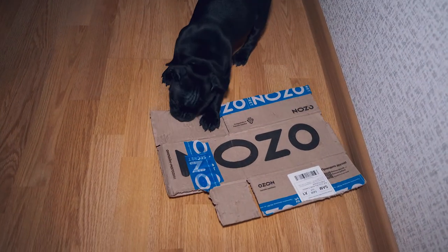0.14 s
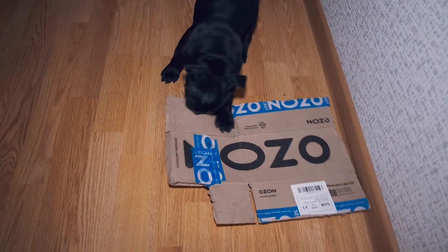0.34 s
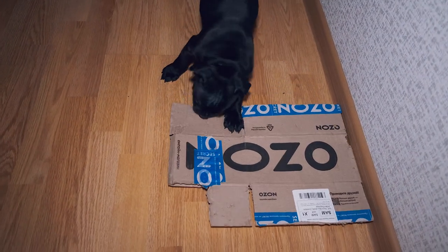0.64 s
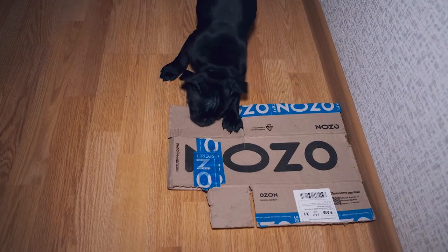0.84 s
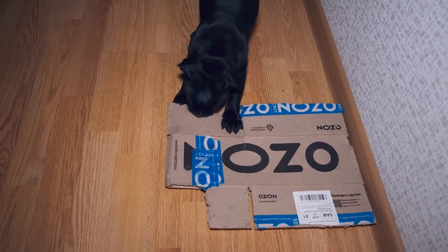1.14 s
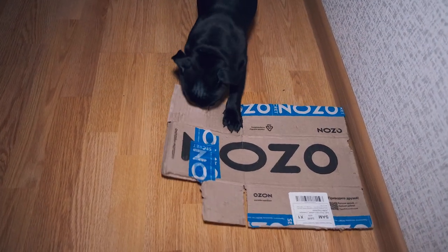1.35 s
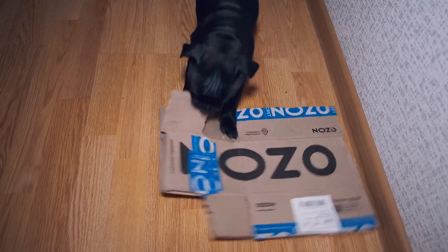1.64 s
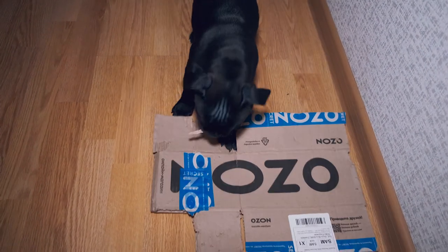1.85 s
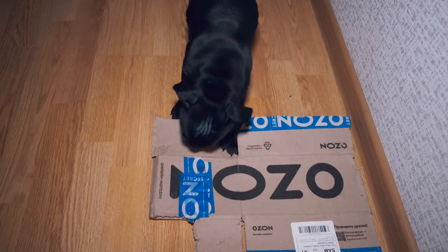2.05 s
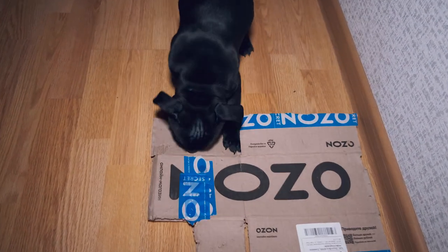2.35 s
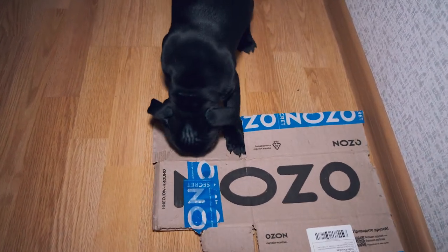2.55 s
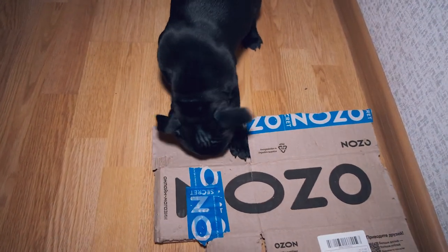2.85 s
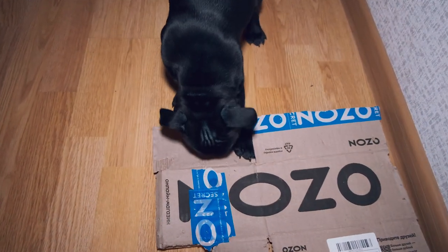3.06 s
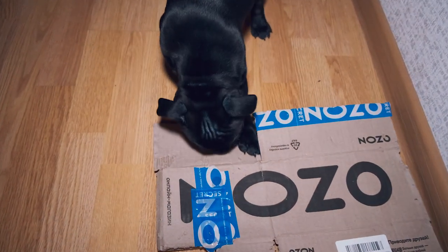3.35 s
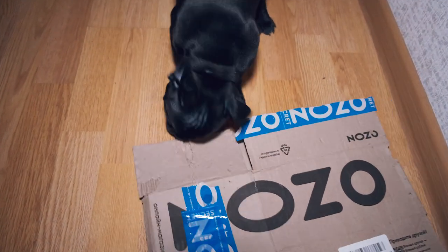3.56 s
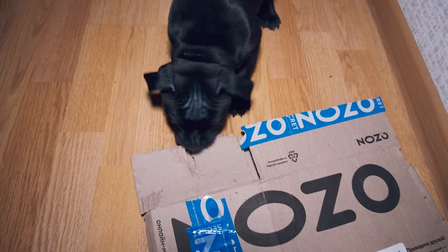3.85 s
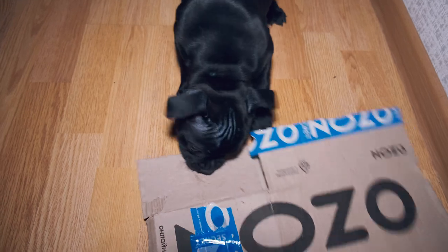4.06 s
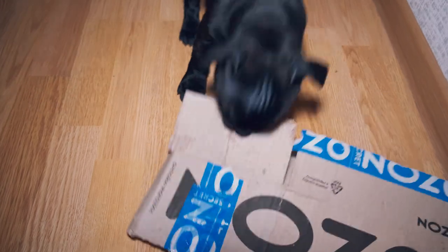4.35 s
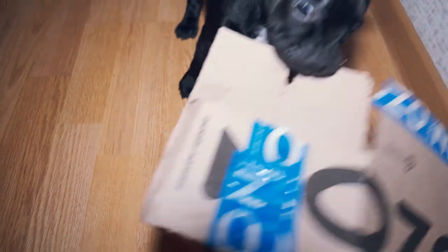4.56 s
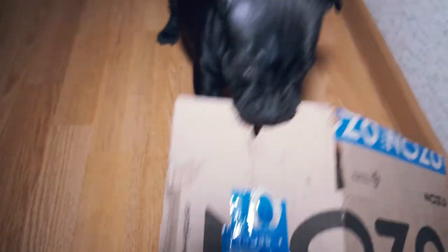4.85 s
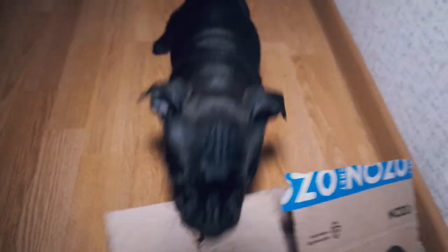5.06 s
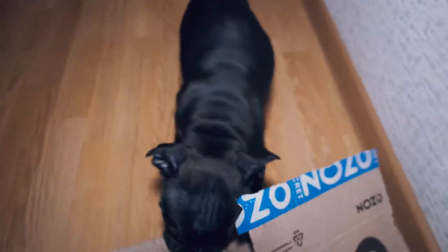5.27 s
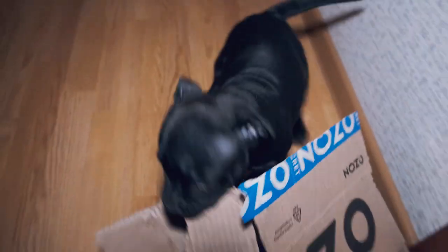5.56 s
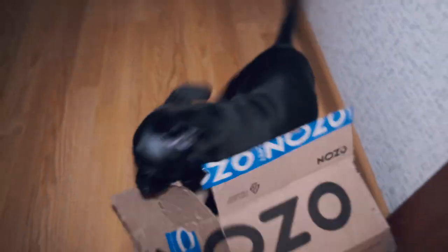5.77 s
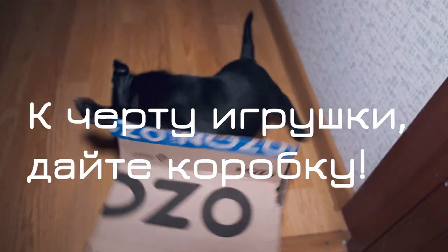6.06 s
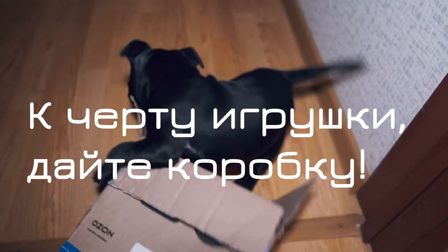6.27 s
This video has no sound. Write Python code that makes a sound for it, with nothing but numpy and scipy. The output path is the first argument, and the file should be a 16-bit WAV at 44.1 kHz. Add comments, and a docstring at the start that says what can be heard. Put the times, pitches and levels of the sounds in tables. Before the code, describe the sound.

Cardboard is bitten and dragged across a hard indoor floor. Woody flute snaps with short falling pitch come irregularly, thickest early on, over fibrous hiss and short groans of the strained sheet. After a sparse lull of soft scratching, the loose sheet flaps, slaps and thuds vigorously to the end. Near microphone, very quiet background air, short bright room echo.

```python
"""A puppy chews and tugs a flattened cardboard box over a laminate floor in a small bare room.
From the start the board scrapes and hisses in strokes of slipping fibres, the loose sheet flaps, paws and
board thump the floor in low resonant noise, and the strained board groans in short gliding tones.
Flutes snap throughout as brief falling rings with cracks and thuds, densest in the second second.
The sheet slaps the floor with claps of noise, mostly from five to six seconds; the walls answer."""
import sys
import numpy as np
from scipy import signal
from scipy.fft import rfft, irfft, next_fast_len
from scipy.io import wavfile
from scipy.ndimage import uniform_filter1d, map_coordinates

SR = 44100
rng = np.random.default_rng(int(sys.argv[2]) if len(sys.argv) > 2 else 0)


def transcribe(signal):
    """Save signal, clipped to [-1, 1], as a 16-bit WAV file at the path in sys.argv[1]."""
    frames = np.atleast_2d(signal).T
    limited = np.clip(frames, -1, 1)
    pcm = np.round(limited * 32767).astype(np.int16)
    wavfile.write(sys.argv[1], SR, pcm)


N = 282240
STEPS_S = np.arange(0, N / SR, .001)  # time steps of the movement envelopes


def amp(db):
    """Decibels to gain."""
    return 10 ** (np.asarray(db) / 20)


def unit(x):
    """Scale to rms 1."""
    return x / np.sqrt(np.mean(x ** 2) + 1e-20)


def along(points, hz):
    """Read (Hz, value) points on a log frequency axis."""
    f, v = np.transpose(points)
    return np.interp(np.log(hz + 1), np.log(f + 1), v)


def per_sample(control):
    """Read a control given at every time step at every sample."""
    return np.interp(np.arange(N) / SR, STEPS_S, control)


def together(powers):
    """The gain of overlapping movements, whose powers add."""
    return per_sample(np.sqrt(sum(powers)))


def wobble(rate):
    """A smooth random curve with rate knots a second."""
    knots = rng.standard_normal(int(N * rate / SR) + 4)
    return map_coordinates(knots, [np.arange(N) * rate / SR])


def filtered(x, response):
    """Filter x by a response that is a function of frequency."""
    size = x.shape[-1]
    m = next_fast_len(size + 8192)
    spectrum = rfft(x, m) * response(np.fft.rfftfreq(m, 1 / SR))
    return irfft(spectrum, m)[..., :size]


def band(x, low_hz, high_hz):
    """A causal band-pass."""
    edges = [low_hz, min(high_hz, SR / 2 - 1)]
    return signal.sosfilt(signal.butter(2, edges, 'bandpass', fs=SR, output='sos'), x)


def resonate(x, modes):
    """Pass x through damped resonances that ring side by side."""
    def response(f):
        return sum(amp(db) * 1j * f * w / (c * c - f * f + 1j * f * w) for c, w, db in modes)
    return filtered(x, response)


def spread(pair, spectrum):
    """Colour two unrelated signals and mix them to left and right, most alike in the bass."""
    # correlation of the two microphone channels: hz, likeness (0 to 1)
    likeness = [(100, 0.93), (400, 0.94), (1000, 0.81), (2000, 0.5), (4000, 0), (12000, .25)]

    def mid_side(hz):
        turn = np.arccos(np.clip(along(likeness, hz), -1, 1)) / 2
        return amp(along(spectrum, hz)) * [np.cos(turn), np.sin(turn)]
    mid, side = filtered(pair, mid_side)
    return unit(np.array([mid + side, mid - side]))


def add(track, s, sound):
    """Mix a sound into the track at time s."""
    start = int(np.clip(round(s * SR), 0, N - 1))
    track[:, start:start + sound.shape[-1]] += sound[..., :N - start]


def room(x, early_db=13, gap_s=.009, early_t60_s=0.055, build_s=0.0018):
    """The walls answer after a short gap: dense first echoes die fast over a slower diffuse tail."""
    # decay of the room: hz, t60_s
    decay_times = [(150, 0.79), (400, 1), (1000, 0.71), (2800, 0.66), (7300, 0.33), (15000, 0.52)]
    # colour of the echoes: hz, level_db
    wall_colour = [(100, 2), (1000, 0), (3000, 2), (8000, 5), (15000, -2.5)]
    hz, t, z = signal.stft(rng.standard_normal((2, SR * 3 // 4)), SR, nperseg=256)
    late = amp(-60 * t / along(decay_times, hz)[:, None])
    early = amp(early_db - 60 * t / early_t60_s)
    tail = signal.istft(z * (late + early), SR, nperseg=256)[1]
    build = 1 - np.exp(-np.arange(tail.shape[1]) / (build_s * SR))
    tail = spread(tail * build, wall_colour) / np.sqrt(tail.shape[1])
    return signal.fftconvolve(x, np.pad(tail, ((0, 0), (int(gap_s * SR), 0))), axes=1)


def gesture(s, length, attack, fall_db_per_s, swell_db=0):
    """Envelope of one movement: it takes hold, builds or fades while it lasts, lets go and lingers."""
    linger, linger_t60_s = amp(-9.5), 0.52  # part of the movement lingers in the room
    t = np.maximum(STEPS_S - s, 0)
    after = np.maximum(t - length, 0)
    release = (1 - linger) * amp(-fall_db_per_s * after) + linger * amp(-60 * after / linger_t60_s)
    swell = amp(swell_db * (np.minimum(t / length, 1) - .5))
    return (1 - np.exp(-(t / attack) ** 2)) * swell * release


def slips(rate, scatter_db, life, smooth):
    """Stick and slip: noise bursts of uneven size at random moments (rate a second), over smooth sliding."""
    sizes = amp(scatter_db * np.clip(rng.standard_normal(N), -2, 2)) * (rng.random(N) < rate / SR)
    energy = signal.lfilter([1], [1, -np.exp(-1 / (life * SR))], sizes ** 2)  # life in s
    return np.sqrt(energy / energy.mean() + smooth ** 2) * rng.standard_normal((2, N))


def quiet_air():
    """The faint air of the room: steady coloured noise."""
    # colour of the air: hz, level_db
    air_colour = [(13, -33), (22, -6), (44, -8), (106, 0), (140, -27.5), (194, -7), (337, -24), (432, -13),
                  (935, -14.5), (1620, -13), (2260, -17), (7000, -21), (16000, -33)]
    return amp(-70.5) * spread(rng.standard_normal((2, N)), air_colour)


def bending(x, colour_db, patchy_db):
    """The bending sheet changes the colour of x and brings out narrow resonances that come and go."""
    hz, t, z = signal.stft(x, SR, nperseg=1024)
    frames = np.minimum((t * SR).astype(int), N - 1)
    patches = uniform_filter1d(rng.standard_normal(z.shape[1:]), size=4, axis=0)
    patches = unit(uniform_filter1d(patches, size=7, axis=1))
    gain = amp(colour_db(hz[:, None] + 1, frames) + patchy_db * patches)
    return unit(signal.istft(z * gain, SR, nperseg=1024)[1][:, :N])


def snap(ring_hz, crack_db, thud_db, t60, rise, crack_share=0.8, thud_t60=0.015, fall=0.55, relax=0.0035):
    """A flute gives way: its fibres crack, the panel rings for a few cycles and the sheet thuds."""
    # modes of a snapping flute: ratio (times the ring pitch), level_db, t60_share
    flute_modes = [(.7, -6, 0.57), (1, -0.5, 0.82), (1.3, -12, 1), (1.72, -13, 1), (2.3, -14, 0.18)]
    # colour of cracking fibres: hz, level_db
    crack_colour = [(1200, -28), (2300, -1), (3300, 1), (4800, -3), (7000, -9.5), (11000, -10),
                    (15000, -16.5)]
    t = np.arange(SR // 10) / SR
    swell = 1 - np.exp(-(t / rise) ** 2)
    # short bending waves run faster through the board, so the pitch falls from above ring_hz to below it
    cycles = np.cumsum(ring_hz * (1 + fall * (np.exp(-t / relax) - .5))) / SR
    ring = np.zeros((2, len(t)))
    for ratio, db, share in flute_modes:
        # each mode reaches the two microphones in slightly different phase
        phase = rng.uniform(0, 2 * np.pi) + rng.normal(0, .27 * ratio, (2, 1))
        decay = amp(db - 60 * t / max(t60 * share, .002))
        ring += decay * np.sin(2 * np.pi * ratio * cycles + phase)
    # noise shared by both channels, with stronger noise of each channel's own
    fibres = rng.standard_normal(len(t)) + 2.9 * rng.standard_normal((2, len(t)))
    fibres = filtered(fibres, lambda hz: amp(along(crack_colour, hz)))
    crack = fibres * swell * amp(-60 * t / (t60 * crack_share))
    thud = band(rng.standard_normal(len(t)) * amp(-60 * t / thud_t60), 240, 750)
    return unit(ring * swell) + amp(crack_db + 9.0) * unit(crack) + amp(thud_db + 0.5) * unit(thud)


def crackling(rate=110, scatter_db=4.5, low_hz=950, high_hz=2000, count=5):
    """Tiny snaps of uneven size at random moments (rate a second), at a few pitches of the board."""
    track = np.zeros((2, N))
    for ring_hz in np.geomspace(low_hz, high_hz, count):
        sizes = amp(scatter_db * np.clip(rng.standard_normal(N), -2, 1.6))
        sizes = sizes * (rng.random(N) < rate / count / SR)
        tiny = snap(ring_hz, crack_db=-16.5, thud_db=-22, t60=0.014, rise=0.00021)
        track += signal.oaconvolve(sizes[None], tiny, axes=1)[:, :N]
    return unit(track)


def rubbing(panel_db=5, panel_octaves=0.85, patchy_db=3.0, hiss_patchy_db=3.0):
    """Slipping fibres hiss, crackle and shake the panel; strokes blend their colours by their power."""
    # strokes of the board over teeth and floor: start_s, length_s, swell_db (over the stroke),
    # scrape_db, hiss_db (relative), rasp_db (in the hiss), sheen_db (tilt of the hiss), panel_hz
    strokes = [(0, 0.15, 6.5, -49.5, -52.5, 3, -2.5, 1630), (0.117, .09, 3, -35.5, -51.5, 7.5, -2, 1600),
               (0.325, .13, 0.5, -40, -51.5, -0.5, 3.5, 1400), (0.492, 0.12, -6.5, -49, -57, -1, -1, 1300),
               (0.635, 0.28, -4, -52, -54.5, -6.5, 5.5, 1470),
               (0.888, 0.084, 14.5, -46, -56, 4.5, 12, 1480), (1.135, .09, 3, -55.5, -57, -2, 1.5, 1400),
               (1.235, .11, -3.5, -30.5, -45, 4.5, -5, 1300), (1.373, .045, 3.5, -41, -39, 3, -0.5, 1310),
               (1.547, 0.036, -0.5, -29.5, -34, 2, -1, 1200), (1.653, 0.03, 4, -22, -36.5, 3, 13, 1080),
               (1.731, .11, -3.5, -36.5, -51.5, 4, 4.5, 1280), (2.069, 0.21, 5.5, -63.5, -68, 1, 6, 1450),
               (2.195, .22, 1.5, -47, -50, -1.5, 3, 1400), (2.525, .15, -3.5, -57, -59, -7, 2, 1352),
               (2.667, 0.12, 15, -39.5, -40.5, 3.5, -0.5, 1800),
               (2.809, 0.042, -2, -31.5, -42, 0.5, -5.5, 2000), (3.417, .16, 3, -37, -38.5, -2.5, 2, 1400),
               (3.63, 0.19, -10, -53.5, -55, -2, 0, 1350), (3.871, .045, 6, -45, -51, -2.5, 3, 1150),
               (3.991, 0.11, -2.5, -42.5, -46, -0.5, 1.5, 1200),
               (4.115, 0.099, 3, -49.5, -47, 1.5, 0, 1600),
               (4.218, 0.23, -1.5, -48.5, -50.5, -1.5, 0.5, 1350),
               (4.461, 0.26, -6.5, -48.5, -54, 0, 1, 1120), (4.74, .05, 7, -48.5, -48, -1.5, 3.5, 1040),
               (4.854, 0.19, -6, -43.5, -44, 1.5, -1, 1170), (5.086, .12, 8, -44, -41.5, -0.5, -0.5, 1100),
               (5.22, 0.086, 1, -34, -46, 3, 4, 1130), (5.33, 0.071, 1, -29, -39.5, 5, 8, 1200),
               (5.406, .11, 3, -28.5, -42.5, 3.5, 5, 1280), (5.542, 0.078, -5, -26, -34.5, -2.5, 0, 1040),
               (5.65, 0.35, 4.5, -35, -43, 1, -0.5, 1250), (5.795, .06, 2, -29.5, -35.5, -4, -0.5, 1270),
               (5.896, 0.048, -4, -41, -36.5, 0, -5, 1190), (6.059, 0.23, -4.5, -39, -46, -1, -1, 1400),
               (6.314, .07, 4.5, -44.5, -50, -1.5, 2, 1560)]
    # colour of the scrape: hz, level_db
    scrape_colour = [(260, -41), (450, -12.5), (513, -6), (799, -3.5), (849, -3), (978, -1), (1140, -2),
                     (1400, -0.5), (2170, -1), (2400, -3), (5000, -20), (6500, -53), (11000, -120)]
    # colour of the fibre hiss: hz, level_db
    hiss_colour = [(1650, -41), (2800, -6.5), (3610, -8.5), (3940, -6.5), (5320, -12), (6670, -9),
                   (11400, -16.5), (14200, -18), (15100, -18.5), (16000, -35.5)]
    grip_s, grip_share = 0.01, 0.099  # a stroke takes hold in this time plus a share of its length
    scrape_fall_db_per_s, hiss_fall_db_per_s = 180.5, 280
    rasp_hz, rasp_octaves = 6800, 0.41  # centre and width of the rasp; the sheen tilts about it

    scraping, hissing = np.zeros((2, len(strokes), len(STEPS_S))) + 1e-14  # power of each stroke
    for k, (s, length, swell_db, scrape_db, hiss_db, *_) in enumerate(strokes):
        attack = grip_s + grip_share * length
        scrape_shape = gesture(s, length, attack, scrape_fall_db_per_s, swell_db)
        hiss_shape = gesture(s, length, attack, hiss_fall_db_per_s, swell_db)
        scraping[k] += (amp(scrape_db) * scrape_shape) ** 2
        hissing[k] += (amp(hiss_db) * hiss_shape) ** 2
    *_, rasps_db, sheens_db, grips_hz = np.transpose(strokes)
    panel_hz = per_sample(grips_hz @ scraping / scraping.sum(0))
    rasp_db = per_sample(rasps_db @ hissing / hissing.sum(0))
    sheen_db = per_sample(sheens_db @ hissing / hissing.sum(0))

    def resonance(hz, i):
        return panel_db * np.exp(-(np.log2(hz / panel_hz[i]) / panel_octaves) ** 2)

    def sheen(hz, i):
        octaves = np.log2(hz / rasp_hz)
        tilt = sheen_db[i] * np.clip(octaves / 0.51, -.6, .7)
        return tilt + rasp_db[i] * np.exp(-(octaves / rasp_octaves) ** 2)

    catches = slips(rate=600, scatter_db=3, life=.001, smooth=1.2)
    scrape = bending(spread(catches, scrape_colour), resonance, patchy_db)
    scrape = unit(scrape + amp(-10) * crackling())
    fine_slips = slips(rate=440, scatter_db=3, life=.0004, smooth=1.8)
    hiss = bending(spread(fine_slips, hiss_colour), sheen, hiss_patchy_db)
    judder = amp(.8 * wobble(45))
    return judder * (together(scraping) * scrape + amp(2.0) * together(hissing) * hiss)


def flapping():
    """The loose sheet swings: uneven bursts of noise excite its low modes."""
    # swings of the sheet: start_s, length_s, level_db (relative)
    swing_list = [(0, 0.25, -47.5), (0.05, 0.039, -38), (0.656, 0.034, -49.5), (0.965, 0.028, -43),
                  (1.106, 0.028, -47.5), (1.279, 0.17, -32), (1.549, 0.02, -31.5), (1.665, 0.028, -30.5),
                  (1.764, 0.074, -39.5), (2.36, 0.034, -51.5), (2.694, .28, -64), (3.467, 0.072, -48.5),
                  (3.94, 0.14, -56), (4.207, .04, -51.5), (4.51, 0.088, -42.5), (4.766, 0.018, -42),
                  (4.878, 0.052, -46), (5.197, 0.019, -32.5), (5.292, .02, -27), (5.36, 0.039, -39),
                  (5.535, 0.063, -38.5), (5.678, 0.22, -41), (5.803, 0.048, -29.5), (5.922, 0.16, -36),
                  (6.172, 0.18, -44)]
    # low modes of the loose sheet and the room: centre_hz, width_hz, level_db
    sheet_modes = [(204, 15, 0), (251, 34, 2), (294.4, 6, 2.5), (382, 71, -9.5), (415, 23, 0.5),
                   (482, 50, -4), (625, 90, -5.5)]
    # colour of the flapping sheet: hz, level_db
    flap_colour = [(90, -36), (150, -7), (190, -0.5), (450, -1.5), (650, -4), (1000, -13.5), (1800, -73.5)]
    attack_s, fall_db_per_s = 0.0076, 134
    swings = together((amp(db) * gesture(s, length, attack_s, fall_db_per_s)) ** 2
                      for s, length, db in swing_list)
    shaken = resonate(slips(rate=75, scatter_db=5.5, life=0.012, smooth=1.0), sheet_modes)
    return amp(-5) * swings * spread(shaken, flap_colour)


def thumping():
    """Paws and board bump the floor: uneven bursts of noise set its deep modes rumbling."""
    # bumps of paws and board: start_s, length_s, level_db (relative)
    bump_list = [(0, 0.023, -64), (0.15, 0.02, -58), (.3, 0.07, -71), (0.65, .22, -52.5),
                 (1.275, 0.16, -55), (1.542, 0.026, -50), (1.65, 0.26, -48.5), (2.004, 0.52, -68.5),
                 (2.7, .35, -72), (3.526, 0.097, -51.5), (4.025, 0.068, -50.5), (4.207, 0.036, -58),
                 (4.566, .03, -56), (4.749, 0.04, -41), (4.86, 0.017, -47.5), (4.99, .3, -57),
                 (5.33, 0.066, -40.5), (5.48, 0.5, -52.5), (5.785, 0.035, -37.5), (5.926, .18, -52.5),
                 (6.255, .11, -44.5)]
    # deep modes of the floor: centre_hz, width_hz, level_db
    floor_modes = [(48, 22, -10.5), (67, 9, 2.5), (95, 9.2, 1.5), (122, 26, -7.5)]
    # colour of the floor's rumble: hz, level_db
    rumble_colour = [(12, -26), (25, -7), (60, -3.5), (120, 0), (160, -14), (300, -46.5)]
    attack_s, fall_db_per_s = 0.01, 150.5
    bumps = together((amp(db) * gesture(s, length, attack_s, fall_db_per_s)) ** 2
                     for s, length, db in bump_list)
    shaken = resonate(slips(rate=32, scatter_db=6, life=0.011, smooth=0.84), floor_modes)
    return amp(-1.5) * bumps * spread(shaken, rumble_colour)


def groaning(waver=0.042, overtone_db=-22, echo_db=-8):
    """The strained board judders briefly at an unsteady, gliding pitch with a faint octave above."""
    # groans and squeaks: centre_s, length_s, pitch_hz, level_db, glide_octaves_per_s
    groan_list = [(0, 0.084, 192, -39, 3.5), (.063, 0.026, 196.8, -32, -1), (0.069, 0.061, 402.5, -40, 3.5),
                  (0.142, .12, 208, -47, -0.5), (1.02, 0.098, 2850, -53.5, -3),
                  (1.137, 0.045, 338, -55.5, 1.5), (1.204, 0.12, 224.6, -50.5, 1),
                  (1.373, .076, 288.6, -35, 4.5), (2.32, .11, 1430, -45, 0), (2.37, .05, 307, -55, 2),
                  (2.43, .1, 445, -48.5, 1), (2.431, 0.14, 587, -52.5, 0.5), (2.844, 0.064, 2200, -29.5, 0),
                  (2.926, .16, 1920, -47.5, -1), (3.003, 0.061, 252.5, -47.5, 1.5),
                  (4.222, .06, 440, -53, 5), (4.568, 0.085, 258, -42.5, -3.5), (4.662, .14, 1110, -50, 1.5),
                  (5.092, 0.07, 248, -53, -2)]
    t = np.arange(N) / SR
    drift, roughness = waver * wobble(110), amp(2 * wobble(70))
    voice = np.zeros(N)
    for s, length, hz, db, glide in groan_list:
        near = np.abs(t - s) < 2 * length
        u = t[near] - s
        pitch_hz = hz * 2 ** (glide * u) * (1 + drift[near])
        phase = 2 * np.pi * np.cumsum(pitch_hz) / SR
        tone = np.sin(phase) + amp(overtone_db) * np.sin(2 * phase)
        voice[near] += amp(db) * np.exp(-(2 * u / length) ** 2) * tone
    direct = np.array([voice, voice]) * roughness
    return direct + amp(echo_db) * room(direct)[:, :N]


def snapping():
    """Flutes snap in the teeth, each from a new spot with its own echoes; lower ones ring longer."""
    # snaps: start_s, level_db (relative), ring_hz, crack_db and thud_db (relative to the ring),
    # echo_db (gain of the room)
    snap_list = [(.130, -19.5, 2100, -18.5, -13, -13.5), (0.1796, -4, 1484, -20, -24, -4),
                 (.378, -31.5, 1360, -23, -36, 0), (0.447, -26, 1505, -30.5, -29, -17.5),
                 (.668, -28, 1500, -16, -12, 0.5), (0.689, -18.5, 1427, -19.5, -23, -6.5),
                 (.950, -20, 1640, -23, -20, -3.5), (.978, -2.5, 1590, -17, -29.5, -10.5),
                 (1.230, -28, 1500, -7, -32, 1), (1.256, -15, 1260, -15, -34, -15),
                 (1.263, -5, 1300, -14.5, -19, -9.5), (1.291, -8, 1200, -12.5, -12, -2.5),
                 (1.323, -8.5, 1286, -22.5, -8, -5), (1.391, -12.5, 1640, -20.5, -32, 3.5),
                 (1.407, -10, 960, -13.5, -22, -2), (1.562, -4, 1450, -17.5, -17, -5),
                 (1.658, -12.5, 1236, -13, -11, 0), (1.67, -13.5, 1390, -20.5, -30, -8.5),
                 (1.680, -12, 1200, -5, -23, -5.5), (1.687, -5, 930, -9, -18, -9.5),
                 (1.793, -27, 1040, -29, -6, 2.5), (1.822, -22, 1430, -23.5, -10.5, -6.5),
                 (1.836, -13.5, 1327, -22.5, -18, -6), (2.225, -22, 1377, -28.5, -30, 0.5),
                 (2.692, -30, 1520, -30, -38, -2.5), (2.827, -25.5, 2270, -10.5, -34.5, -8),
                 (3.911, -30.5, 1030, -10, -39, -3.5), (3.972, -25.5, 1060, -19.5, -24, -0.5),
                 (4.018, -21, 1300, -23, -13.5, -2), (4.188, -35, 1860, -7.5, -25, -12),
                 (4.488, -24, 1210, -33, -10.5, -6.5), (4.492, -29.5, 1110, -30.5, -15, -3),
                 (4.791, -28.5, 1023, -10, -0.5, -3.5), (5.534, -10.5, 986, -25, -34, -6.5),
                 (5.557, -5.5, 1040, -29, -15.5, -1), (5.567, -12, 890, -18.5, -31, -8),
                 (5.600, -15.5, 1694, -25.5, -12, -7), (6.181, -22.5, 1430, -19, -27, 0),
                 (6.252, -25.5, 2250, -25, -8, -2.5)]
    ring_cycles = 24  # the longest mode dies by 60 dB in this many periods of ring_hz
    give_s = 0.0014  # the time a flute takes to give way
    track = np.zeros((2, N))
    for s, db, ring_hz, crack_db, thud_db, echo_db in snap_list:
        direct = amp(db - 24) * snap(ring_hz, crack_db, thud_db, ring_cycles / ring_hz, give_s)
        add(track, s, direct)
        add(track, s, amp(echo_db) * room(direct))
    return track * amp([[-.6], [.6]])  # slightly to the right


def slapping(echo_db=-3):
    """The flat sheet lands with short, unpitched claps of noise, each with its own bass and treble."""
    # slaps of the sheet on the floor: start_s, level_db (relative), treble_db_per_octave (above 1 kHz),
    # bass_db, t60_s
    slap_list = [(1.345, -26, -1, 2.5, 0.015), (3.716, -31, -2, 7, 0.037), (4.777, -40, 0, 13, .03),
                 (4.984, -11.5, -2, 0, 0.029), (4.999, -16, -8.5, -5, 0.067), (5.071, -24.5, 0.5, -8, .02),
                 (5.212, -15.5, -2.5, -23, 0.015), (5.226, -17, -5, 15, 0.03), (5.303, -11, -6, 10, 0.041),
                 (5.3333, -10.5, -1.5, 8, 0.047), (5.694, -19, 2.5, 10.5, 0.0154),
                 (5.819, -12.5, -1.5, -11, .016), (5.849, -8.5, 1.5, -28, 0.0082),
                 (5.934, -15.5, 2, 4, 0.018), (5.952, -17, -7.5, 13, .016), (5.969, -23.5, -3.5, -2, .02),
                 (6.016, -18, -7, 1.5, 0.02)]
    # shared colour of the slaps: hz, level_db
    slap_colour = [(120, -31), (220, -18.5), (600, 1.5), (1100, -1.5), (2000, -5.5), (3200, -6.5),
                   (4500, -23), (9000, -25.5), (15000, -32)]
    track, t = np.zeros((2, N)), np.arange(SR // 10) / SR
    rise_s = .0006
    for s, db, slope_db, bass_db, t60 in slap_list:
        colour = []
        for hz, level in slap_colour:
            treble = slope_db * max(np.log2(hz / 1000), 0)
            bass = bass_db / (1 + (hz / 450) ** 4)
            colour.append((hz, level + treble + bass))
        clap = spread(rng.standard_normal((2, len(t))), colour)
        clap = clap * (1 - np.exp(-t / rise_s)) * amp(-60 * t / t60)
        direct = amp(db - 23.5) * unit(band(clap, 180, 16000))  # a light sheet radiates no deep bass
        add(track, s, direct)
        add(track, s, amp(echo_db) * room(direct))
    return track


def scene():
    """Puppy and cardboard over the faint air of the room."""
    return quiet_air() + rubbing() + flapping() + thumping() + groaning() + snapping() + slapping()


def record(dry):
    """The microphone channels clip at full scale, then keep nothing above the band limit."""
    top_hz = 16100
    return filtered(np.clip(dry, -1, 1), lambda hz: hz < top_hz)


dry = scene()
out = record(dry)
transcribe(out)
```